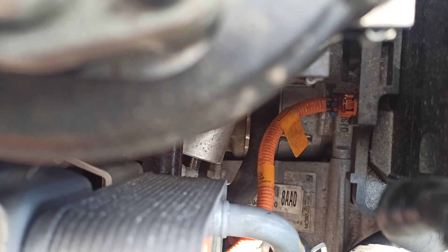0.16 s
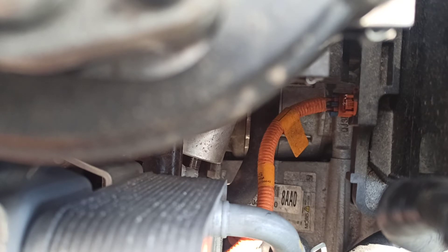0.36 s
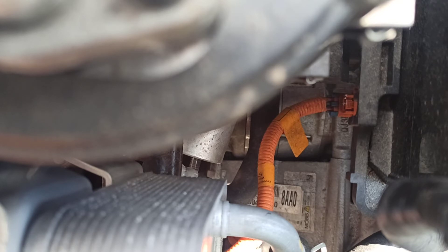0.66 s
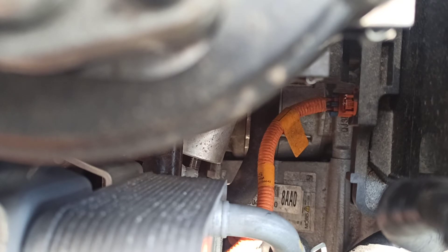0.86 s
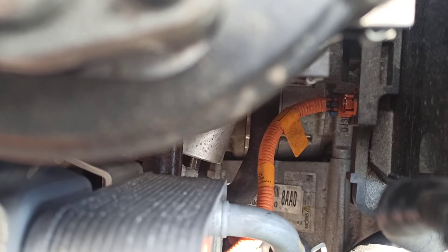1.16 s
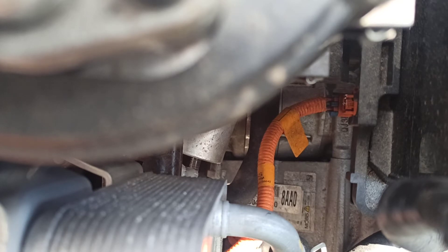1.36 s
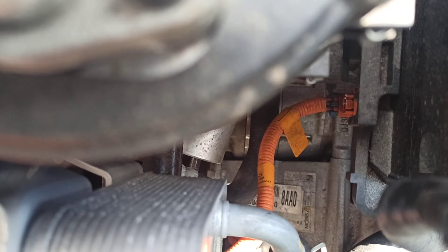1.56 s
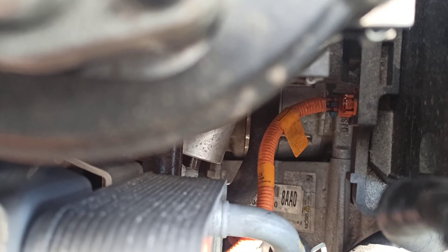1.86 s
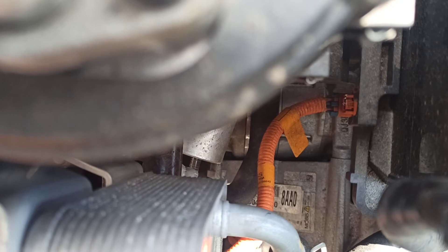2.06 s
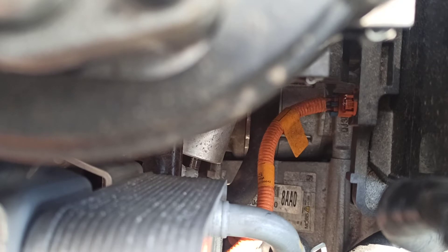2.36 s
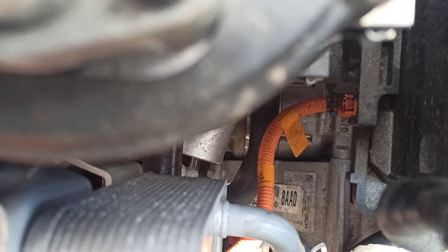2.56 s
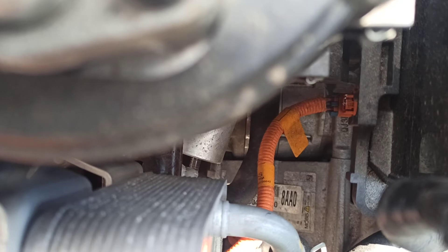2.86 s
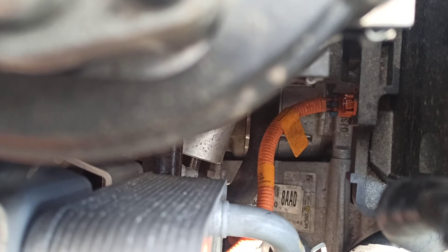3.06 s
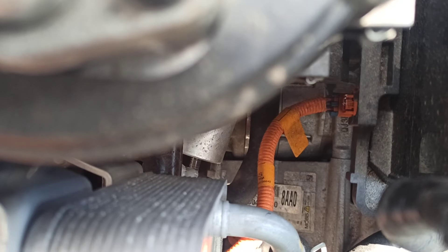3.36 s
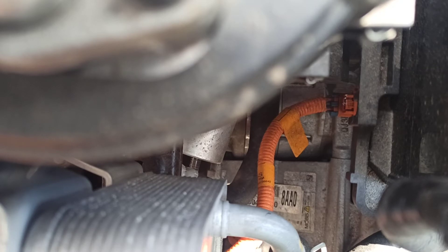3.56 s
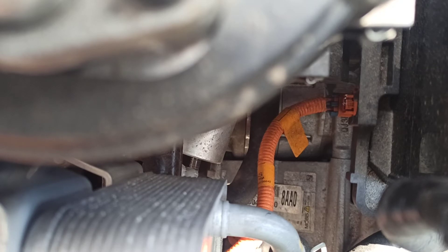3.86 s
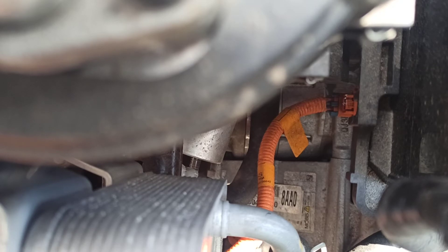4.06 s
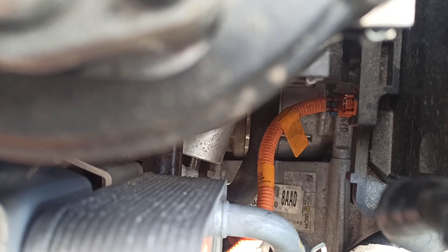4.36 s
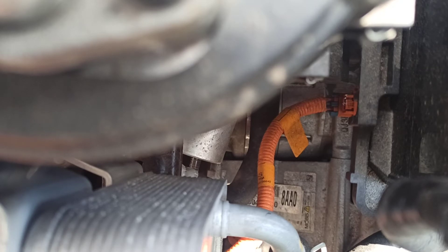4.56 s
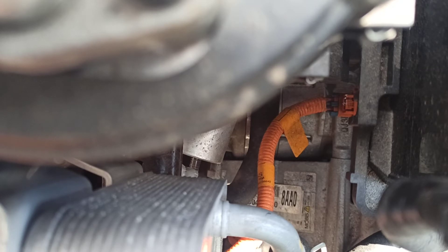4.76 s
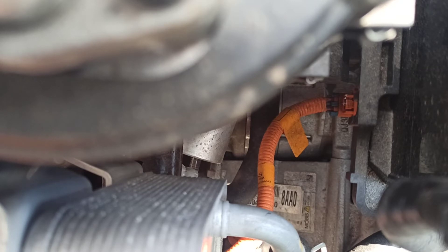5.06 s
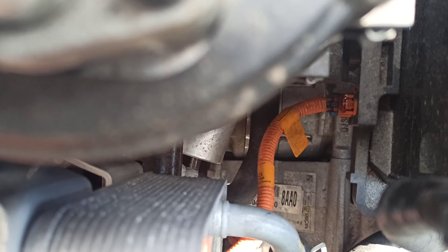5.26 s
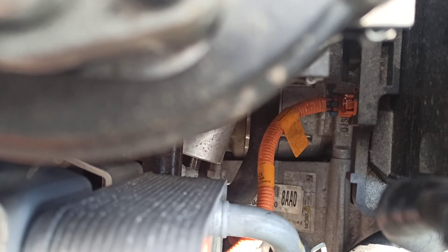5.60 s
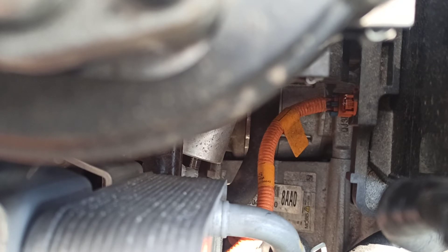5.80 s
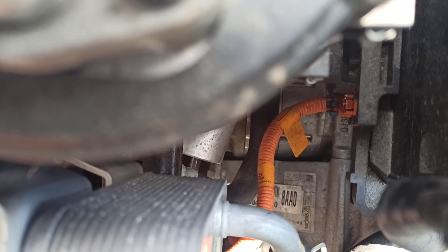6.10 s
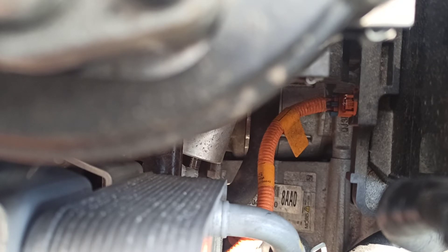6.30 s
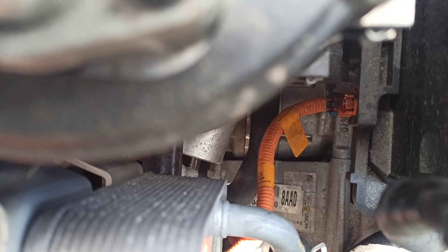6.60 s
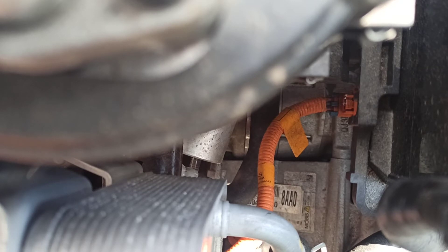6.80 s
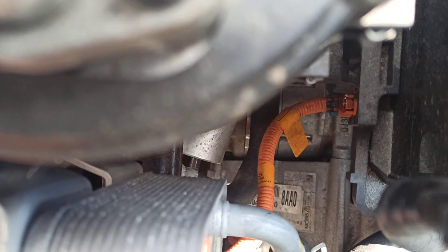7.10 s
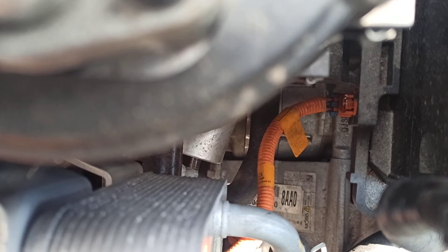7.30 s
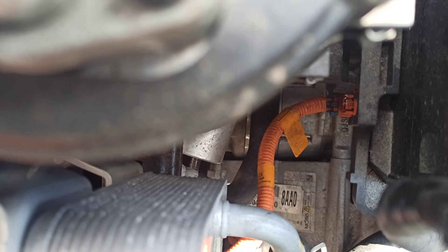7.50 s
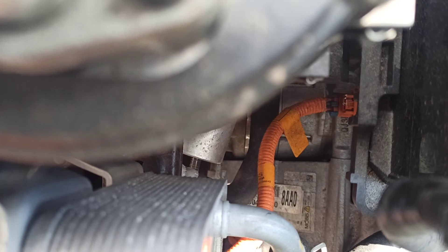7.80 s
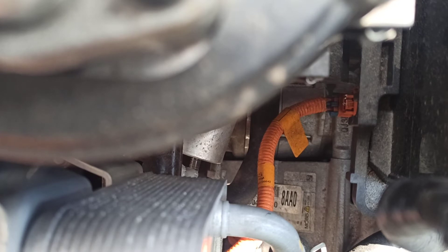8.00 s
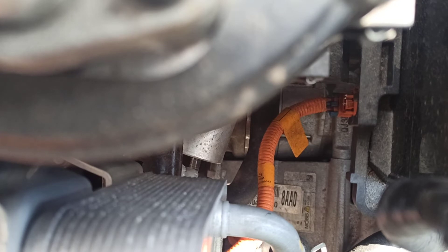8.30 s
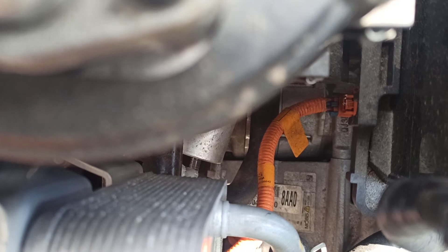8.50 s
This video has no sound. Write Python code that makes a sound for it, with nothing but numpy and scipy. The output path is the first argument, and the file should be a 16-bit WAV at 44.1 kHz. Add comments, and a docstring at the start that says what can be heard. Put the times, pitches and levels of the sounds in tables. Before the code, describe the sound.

Under a car, bursts of hard metallic clacks precede two short electric compressor runs, each a rising, leaping, sliding whine with gas hiss, ending in a clack.

```python
"""Under a car: an electric air-conditioning compressor starts and stops twice, heard by a phone.
Before each run a burst of hard clacks, made of noise and decaying tones, rings the engine bay and pipes.
Then the motor starts with a thin whine of sines, whose pitch climbs, leaps up and slides back, while gas
hisses as shaped noise. A click, a clack and a dull rebound end each run. A low outdoor rumble lies underneath."""
import sys
import numpy as np
from scipy import signal
from scipy.fft import rfft, irfft, next_fast_len
from scipy.io import wavfile
from scipy.ndimage import uniform_filter1d

SR = 44100
rng = np.random.default_rng(int(sys.argv[2]) if len(sys.argv) > 2 else 0)


def generate_wav(sig):
    """Save sig (samples, or channels by samples) to the path in sys.argv[1] as 16-bit PCM at SR."""
    pcm = np.round(np.clip(np.atleast_2d(sig).T, -1, 1) * 32767).astype(np.int16)
    wavfile.write(sys.argv[1], SR, pcm)


N = 381465
TIME = np.arange(N) / SR

# runs of the compressor:
# (start [s], stop [s], jolt as the whine leaps [dB], settling time after the leap [s])
RUNS = [(1.528, 3.1461, -35.5, .075), (7.149, 7.9502, -48, .14)]
# motor whine: (multiple of the base rate, relative level [dB], change at the height of the leap [dB])
WHINE = [(24, -1, -8), (54, 0, 7.5), (108, -19, 5)]
# inverter tones: (offset from the carrier [base rates], relative level [dB])
INVERTER_TONES = [(-15, 10), (5, 5), (8, 4)]
# resonances of the running compressor's casing: (frequency [Hz], width [Hz], relative level [dB])
CASING = [(474, 15, 5.5), (904, 33, 0), (1536, 33, -5), (2068, 63, -3), (2386, 20, -7), (2875, 40, -14),
          (3270, 77, -31), (3750, 77, -17.5), (4320, 90, -15), (5490, 29, -24), (5880, 96, -10.5),
          (6600, 52, -30), (6840, 36, -23), (7070, 71, -11), (7540, 43, -7), (8300, 98, -14.5),
          (8850, 64, -27)]
# resonances of the engine bay: (frequency [Hz], width [Hz], relative level [dB])
BAY = [(465.1, 26, 4), (760, 34, -1.5), (901.5, 42, -0.5), (1110, 30, -14.5), (1528.5, 32, -3),
       (1898, 92, -0.5), (2138, 52, -0.5), (2403, 22, -7), (2560, 42, -10), (3230, 100, -8.5),
       (3300, 66, -14), (3745, 100, -6), (4120, 143, 1.5), (4350, 89, -37), (4853, 110, -3.5),
       (5060, 49, -22.5), (5900, 280, -23), (6340, 56, -43), (6390, 97, -4.5), (7610, 150, 1.5),
       (7300, 110, -10), (8300, 75, -21.5)]
# clatter before each run: (time [s], level before mixing [dB], low thud relative [dB], treble relative [dB])
CLACKS = [(0.9334, -13, -2.5, -8), (0.9395, -6.5, -2, -1.5), (0.9464, -7, -5.5, -12.5),
          (0.963, -6.5, -3.5, -3.5), (0.9781, -14.5, 4.5, -2), (1.0011, -11.5, -3.5, -9.5),
          (1.0114, -12.5, -8, -6), (1.0399, -14, -13, -3.5), (1.0514, -14.5, -4.5, -9),
          (6.3666, -15.5, -13, -19), (6.374, -23, -9, -18), (6.3854, -6.5, -3, -4.5),
          (6.4059, -7, -11.5, -7), (6.4314, -18, -11.5, -5), (6.4446, -19, 1.5, -3.5)]
# light ticks while the motor stands: (time [s], level before mixing [dB])
TICKS = [(1.4792, -37), (4.25, -52), (4.6173, -48), (4.6333, -44), (7.0262, -40.5), (7.0858, -42.5)]
# lingering tones of pipes and brackets: (frequency [Hz], time to fall by 60 dB [s],
# relative level in the clatter before each run [dB], relative level at the stop [dB])
PIPES = [(318, .6, -19, -23), (479, .22, 3, 4), (533, .34, -13, -1), (587, .22, -10, -1),
         (818, .42, -12, 1), (969, .4, -21, -19), (1529, .55, -14, -20), (1795, 2, -37, -30),
         (2353, .22, -7, -9), (3418, .45, -24, -30), (7434, .43, -22, -29)]
# tone colour of the gas hiss: (frequency [Hz], relative level per Hz [dB])
GAS = [(200, -47), (450, 10), (900, 10.5), (1300, 5), (2200, 7.5), (2900, -3.5), (4300, 1), (6000, -4),
       (7400, 0.5), (9500, -7), (12500, -16), (15500, -11)]
# tone colour of a jolt: (frequency [Hz], relative level per Hz [dB])
JOLT = [(100, -14), (300, -4.5), (600, 2.5), (1000, -10), (1600, -3.5), (3000, -21), (4300, -10.5),
        (7500, -11.5), (10000, -14.5), (15000, -18.5)]
# tone colour of a clack's crack: (frequency [Hz], relative level per Hz [dB])
CRACK = [(50, -41.5), (110, -14.5), (220, -4), (310, -13), (420, 1.5), (620, 0.5), (850, -3), (1200, -5.5),
         (2100, -1.5), (2700, -9.5), (4300, -10.5), (7500, -8.5), (10000, -19.5), (15000, -30)]
# tone colour of the outdoor rumble: (frequency [Hz], relative level per Hz [dB])
OUTDOORS = [(25, -35), (50, -18.5), (66, -10.5), (87, 0), (108, -1.5), (150, -5), (190, -11), (300, -15.5),
            (550, -19.5), (850, -22.5), (1200, -28.5), (3000, -36), (7000, -35), (14000, -46)]
# faint far-off tones: (time [s], length [s], frequency [Hz], peak level [dB])
FAR_TONES = [(0.0, 0.13, 594, -59), (4.411, 0.12, 572, -55)]
# how unlike the two microphone ports hear: (frequency [Hz], side minus mid [dB])
WIDTH = [(100, -16), (200, -7.5), (400, -7), (700, -2.5), (1250, 2), (2200, -4), (3500, 0)]
# the phone's uneven treble: (from [Hz], to [Hz], left [dB], right [dB])
MICROPHONE = [(4800, 6150, -6, -10), (6150, 7750, 1, -4), (7750, 8600, -2, -7), (8600, 11600, -15, -16)]

# every start is alike: the base rate of the whine starts low and climbs steadily for a fixed time
START_HZ, RAMP_HZ_PER_S, RAMP_S = 3.4, 30.5, .571
# then the whine leaps to about twice its pitch, drops back quickly and slides down
LEAP_HZ, LEAP_S, SETTLED_HZ, SLIDE_HZ_PER_S = 40, .06, 28, 13
# the drive cuts out this long before the shaft stops dead
COAST_S = 0.063
# the whine's base level, the share that bypasses the resonances, its flicker
WHINE_DB, DIRECT, FLICKER_DB = -49, .05, 3.5
# the unrest of the whine's pitch as a share of its rate, at or below the reference rate
JITTER = .024
# an echo under the car interferes with the whine as it sweeps: its delay and strength (0-1)
ECHO_S, ECHO_GAIN = .0087, .65
# levels at the reference rate and their rise for each doubling of the rate
REFERENCE_HZ = 20
GAS_DB, GAS_RISE_DB = -50, 6
CASING_DB, CASING_RISE_DB = -51.5, 5
# the hiss rises further with the leap; coasting chokes it and makes the casing shudder
LEAP_GAS_DB, CHOKE_DB, SHUDDER_DB = 3, -8, -42
TOP_HZ = 15900  # where the phone cuts the top


def undb(db):
    """Turn decibels into gain."""
    return 10 ** (np.asarray(db) / 20)


def unit(x):
    """Scale to an rms (average strength) of 1."""
    return x / np.sqrt(np.mean(x ** 2))


def shape(points):
    """Gain at any frequency, drawn through (frequency [Hz], level [dB]) points."""
    hz, db = np.transpose(points)
    return lambda f: undb(np.interp(np.log(f + 1), np.log(hz), db))


def resonances(peaks):
    """Response of objects that favour certain pitches; neighbours in the table have opposite signs."""
    def response(f):
        total = 0
        for k, (hz, width, db) in enumerate(peaks):
            peak = 1j * f * width / (hz ** 2 - f ** 2 + 1j * f * width)
            total = total + (-1) ** k * undb(db) * peak
        return total
    return response


def filtered(x, response):
    """Change a sound's tone by scaling each of its frequencies."""
    size = next_fast_len(x.shape[-1], True)
    hz = np.arange(size // 2 + 1) * SR / size
    return irfft(rfft(x, size) * response(hz), size)[..., :x.shape[-1]]


def noise(response, size):
    """Coloured stereo noise, alike at both ports in the bass and less alike in the treble."""
    mid, side = rng.standard_normal((2, size))
    side = filtered(side, shape(WIDTH))
    return unit(filtered(np.array([mid + side, mid - side]), response))


def wobble(size, hz):
    """A random wobble of rms 1, mostly slower than the given rate."""
    return unit(filtered(rng.standard_normal(size), lambda f: 1 / (1 + (f / hz) ** 2)))


def fade(t, t60):
    """Smooth dying away, by 60 dB in t60 seconds."""
    return np.exp(-np.log(1000) * t / t60)


def ring(modes, t):
    """Decaying (Hz, gain, t60) tones; the higher ones reach the two ports more out of step."""
    out = 0
    for hz, gain, t60 in modes:
        lag = np.arctan(shape(WIDTH)(hz)) * rng.choice([-1, 1]) * np.array([[1], [-1]])
        tone = np.sin(2 * np.pi * (hz * t + rng.random()) + lag)
        out = out + gain * fade(t, t60) * tone
    return out


def add(out, start_s, sound):
    """Mix a sound in from a given time."""
    i = max(int(start_s * SR), 0)
    out[:, i:i + sound.shape[-1]] += sound[:, :N - i]


def compressor(length_s, settle_s, inverter_db=-62, ripple=0.1, throb_db=0.95, flutter_db=1.2,
               squeeze_db=5, carrier_hz=9950):
    """One run: the whine sweeps, gas throbs once a cycle of the base rate, the inverter sings."""
    t = TIME[:int(length_s * SR)]
    gate = np.clip(t / 0.027, 0, 1) * np.clip((length_s - t) / 0.0017, 0, 1)
    hz, leap = base_rate(t, settle_s)
    doublings = np.log2(hz / REFERENCE_HZ)
    coast = np.clip(1 - (length_s - t) / COAST_S, 0, 1)
    pressure = np.clip((t - .5) / .5, 0, 1)

    # as pressure builds, each compression sways the whine's pitch and makes the motor strain
    stroke = pressure * np.sin(2 * np.pi * np.cumsum(hz) / SR)
    steadiness = np.minimum(REFERENCE_HZ / hz, 1) ** 2  # a high rate is steadier
    unrest = (ripple * stroke + JITTER * wobble(len(t), 77)) * steadiness
    angle = 2 * np.pi * np.cumsum(hz * (1 + unrest)) / SR

    whine = motor_whine(hz, angle, leap)
    whine *= undb(WHINE_DB + squeeze_db * (stroke - pressure / 2))
    whine *= undb(FLICKER_DB * wobble(len(t), 31))
    whine = through_body(whine)

    # the inverter's tones fan out as the rate climbs and fade as the motor takes up its load
    inverter = sum(undb(db) * np.sin(2 * np.pi * carrier_hz * t + order * angle)
                   for order, db in INVERTER_TONES)
    inverter *= undb(inverter_db) * hz / LEAP_HZ * (1 - .85 * pressure)

    # hiss and casing noise grow with the rate and sink once the drive is cut; then the casing shudders
    gas = noise(shape(GAS), len(t)) * undb(GAS_DB + GAS_RISE_DB * doublings + LEAP_GAS_DB * leap)
    casing = noise(resonances(CASING), len(t)) * undb(CASING_DB + CASING_RISE_DB * doublings)
    low_casing = noise(lambda f: resonances(CASING)(f) / (1 + (f / 1200) ** 4), len(t))
    shudder = low_casing * undb(SHUDDER_DB) * coast
    flow = undb(CHOKE_DB * coast + throb_db * stroke + flutter_db * wobble(len(t), 76))
    return gate * ((gas + casing) * flow + shudder + whine + inverter)


def base_rate(t, settle_s):
    """Rate that sets the whine's pitch [Hz] and strength of its leap (0-1), t seconds after a start."""
    ramp = START_HZ + RAMP_HZ_PER_S * np.minimum(t, RAMP_S)
    rise = np.clip((t - RAMP_S) / LEAP_S, 0, 1)
    since_peak = np.maximum(t - RAMP_S - LEAP_S, 0)
    drop_back = np.exp(-since_peak / settle_s)
    after = SETTLED_HZ - SLIDE_HZ_PER_S * since_peak + (LEAP_HZ - SETTLED_HZ) * drop_back
    return ramp + rise * (after - ramp), rise * drop_back


def motor_whine(hz, angle, leap):
    """Tones at whole multiples of the base rate, whose balance shifts in the leap."""
    ports = np.array([[1], [-1]])
    whine = 0
    for order, db, strain_db in WHINE:
        lag = ports * np.arctan(shape(WIDTH)(order * hz))
        whine = whine + undb(db + strain_db * leap) * np.sin(order * angle + lag)
    return whine


def through_body(whine):
    """The whine swells as it crosses casing or bay resonances, sinks between, and meets its echo."""
    def response(f):
        body = DIRECT + abs(resonances(CASING)(f)) + abs(resonances(BAY)(f)) / 2
        echo = 1 + ECHO_GAIN * np.exp(-2j * np.pi * f * ECHO_S)
        bass_cut = 1 + (380 / (f + 1)) ** 6
        return echo * body ** .55 / bass_cut  # the power evens out the resonances
    return filtered(whine, response)


def jolts(start_db=-36.0):
    """The current steps as each run starts and again as its whine leaps."""
    out = np.zeros((2, N))
    for start, _, leap_db, _ in RUNS:
        add(out, start, jolt(start_db))
        add(out, start + RAMP_S, jolt(leap_db))
    return out


def jolt(level_db, thud_db=-1, tick_t60=0.059, thud_t60=0.33):
    """A step of current snaps the windings and nudges the motor in its mounts."""
    t = TIME[:SR // 3]
    burst = noise(shape(JOLT), len(t))
    thud = filtered(burst, lambda f: 1 / (1 + (f / 900) ** 4))
    tick = (burst - thud) * fade(t, tick_t60)
    return undb(level_db) * (tick + undb(thud_db) * thud * fade(t, thud_t60))


def stops(rebound_s=.005):
    """A click as the drive cuts out, a clack as the shaft stops dead, then a dull rebound."""
    out = np.zeros((2, N))
    for _, stop, *_ in RUNS:
        add(out, stop - COAST_S, clack(level_db=-34, thud_db=-13, treble_db=-1.5))
        add(out, stop, clack(level_db=-13.5, thud_db=-4.0, treble_db=-6))
        add(out, stop, pipes(level_db=-38.0, column=3))
        add(out, stop + rebound_s, clack(level_db=-19.5, thud_db=3.5, treble_db=-15))
    return out


def clacks(pipes_db=-26.5):
    """The hard blows of the clatter, which set the pipes ringing, and the light ticks."""
    out = np.zeros((2, N))
    for s, level_db, thud_db, treble_db in CLACKS:
        add(out, s, clack(level_db, thud_db, treble_db))
        add(out, s, pipes(level_db + pipes_db, column=2))
    for s, level_db in TICKS:
        add(out, s, clack(level_db, thud_db=-6, treble_db=-7))
    return out


def clack(level_db, thud_db, treble_db, crack_t60=0.083, thud_t60=0.15, bay_db=-4, crack_db=-6,
          swell_s=0.0032, contact_s=0.00061):
    """One blow: a crack scattered by nearby metal, with the bay's short resonances."""
    t = TIME[:SR // 4]
    colour = shape([(900, level_db + thud_db), (1400, level_db), (2400, level_db),
                    (6300, level_db + treble_db)])
    scatter = filtered(noise(shape(CRACK), len(t)), colour)
    thud = filtered(scatter, lambda f: 1 / (1 + (f / 1000) ** 6))
    swell = 1 - np.exp(-t / swell_s)  # the lows build up late and stay longer
    contact = 1 - np.exp(-t / contact_s)
    crack = (scatter - thud) * contact * fade(t, crack_t60)
    crack += thud * swell * fade(t, thud_t60)
    # the wider a resonance, the sooner it dies away
    modes = [(hz, undb(db) * colour(hz) * np.sqrt(width / 50), np.log(1000) / np.pi / width)
             for hz, width, db in BAY]
    return undb(crack_db) * crack + undb(bay_db) * ring(modes, t) * swell


def pipes(level_db, column):
    """Pipes and brackets ring on after a hard blow, mixed by one column of their table."""
    modes = [(mode[0], undb(level_db + mode[column]), mode[1]) for mode in PIPES]
    return ring(modes, TIME[:3 * SR // 2])


def panels(x, count=14):
    """Nearby metal panels throw the treble back within a few milliseconds and comb it."""
    echoes = np.zeros((2, SR // 50))
    for side in echoes:
        lag_s = rng.uniform(.0005, .009, count)
        side[(lag_s * SR).astype(int)] = rng.choice([-1, 1], count) * fade(lag_s, .05) * .3
    treble = filtered(x, lambda f: 1 - 1 / (1 + (f / 2800) ** 6))
    combed = treble + signal.fftconvolve(treble, echoes, axes=1)[:, :N]
    gain = np.sqrt(1 + np.sum(echoes ** 2, axis=1, keepdims=True))  # what the echoes add in strength
    return x - treble + combed / gain


def outdoors(rumble_db=-51.5, hum_hz=218, hum_width_hz=4, hum_db=-63, swell_db=-0.35):
    """A rumble with gently swelling lows, a wavering hum of narrow noise and brief far-off tones."""
    swell = wobble(N, 3)
    out = noise(shape(OUTDOORS), N) * undb(rumble_db)
    lows = filtered(out, lambda f: 1 / (1 + (f / 400) ** 4))
    out += (undb(swell_db * swell) - 1) * lows
    out += noise(lambda f: 1 / (1 + ((f - hum_hz) / hum_width_hz) ** 2), N) * undb(hum_db)
    for s, length, hz, db in FAR_TONES:
        t = TIME[:int(length * SR)]
        tone = np.hanning(len(t)) * np.sin(2 * np.pi * hz * t)
        add(out, s, undb(db) * tone * np.ones((2, 1)))
    return out


def scene():
    """Two runs, jolts, stops and clatter among the panels, over the outdoor background."""
    machine = clacks() + jolts() + stops()
    for start, stop, _, settle_s in RUNS:
        add(machine, start, compressor(stop - start, settle_s))
    return panels(machine) + outdoors()


def record(dry):
    """The phone rounds the loudest peaks, colours the treble of each side and cuts the top."""
    def colour(f):
        db = sum(np.array([[left], [right]]) * ((f >= low) & (f < high))
                 for low, high, left, right in MICROPHONE)
        return uniform_filter1d(undb(db), size=1000)  # soften the steps between bands
    rounded = .9 * np.tanh(dry / .9)
    heard = filtered(rounded, colour)
    top_cut = signal.ellip(10, .2, 80, TOP_HZ, fs=SR, output="sos")
    return signal.sosfilt(top_cut, heard)


dry = scene()
out = record(dry)
generate_wav(out)
```